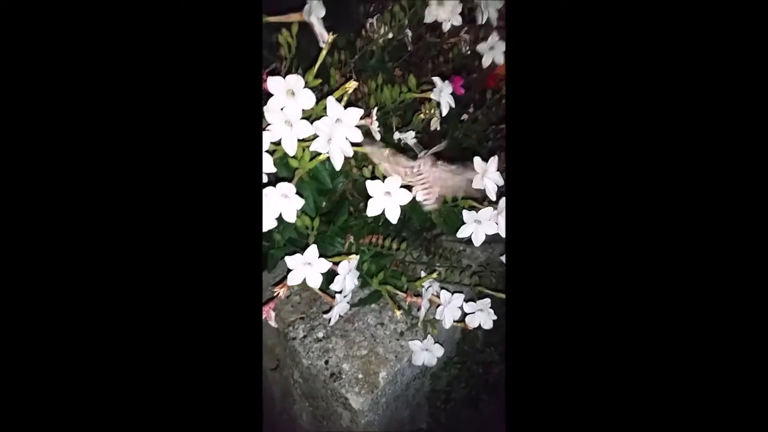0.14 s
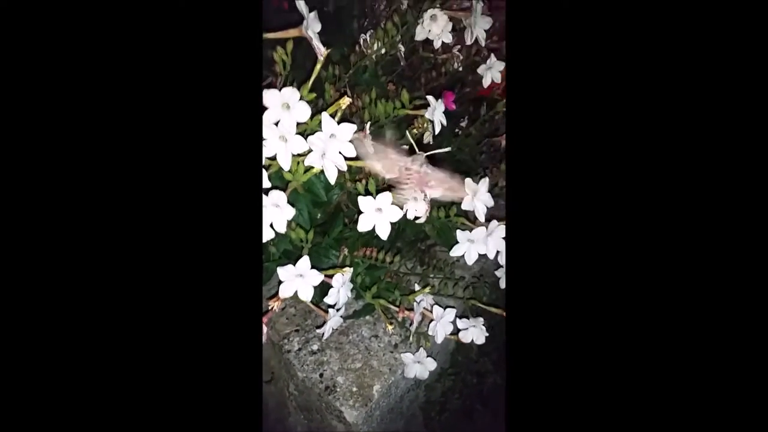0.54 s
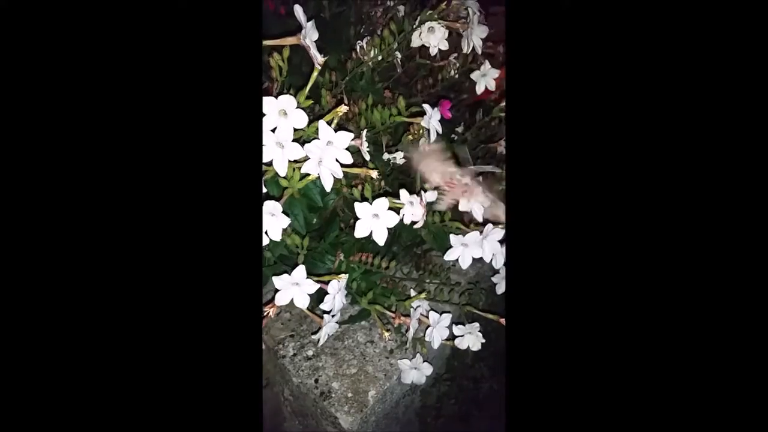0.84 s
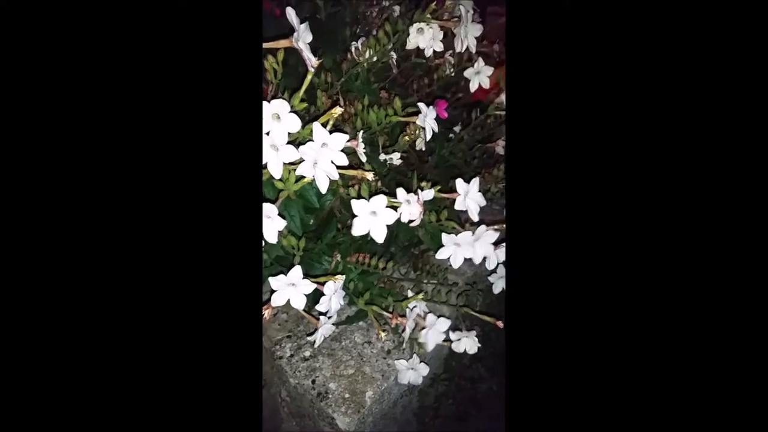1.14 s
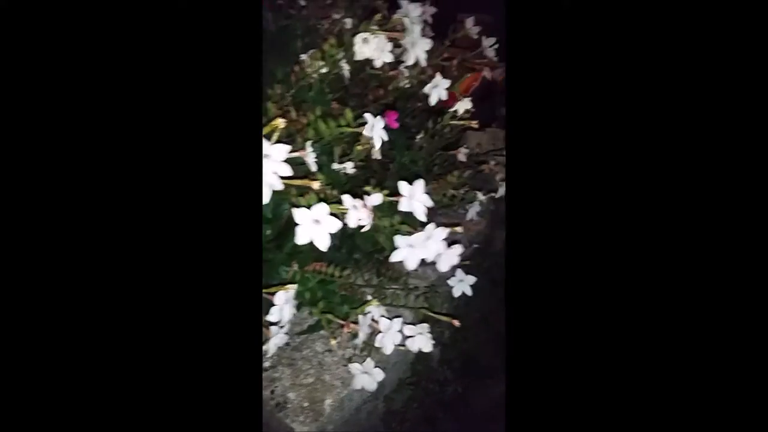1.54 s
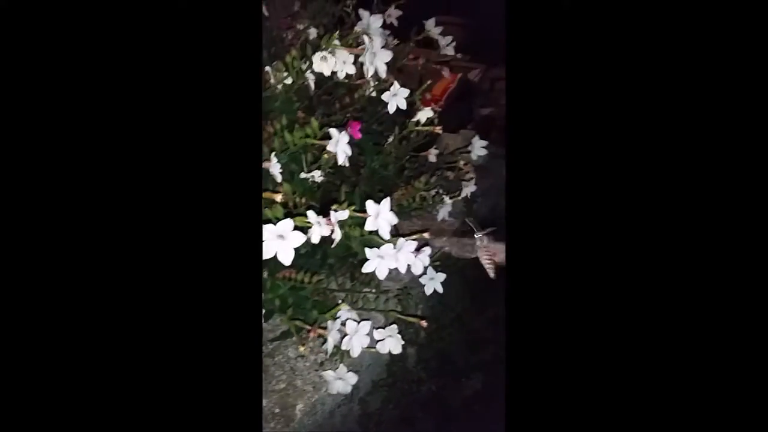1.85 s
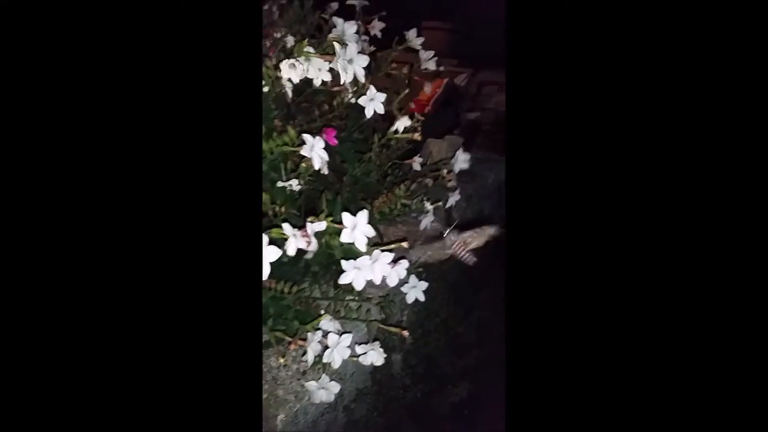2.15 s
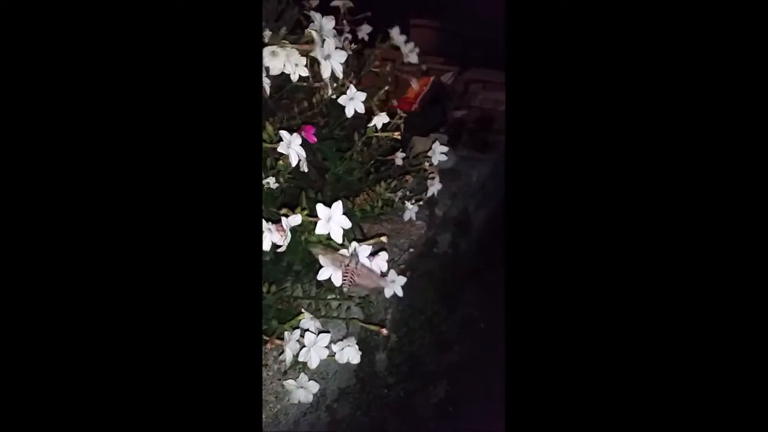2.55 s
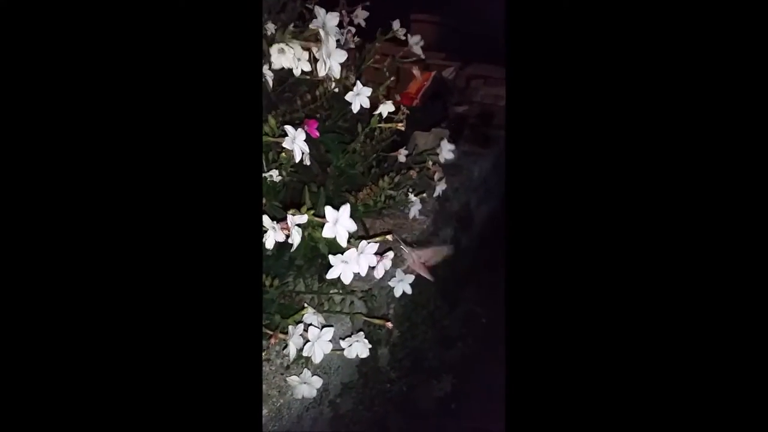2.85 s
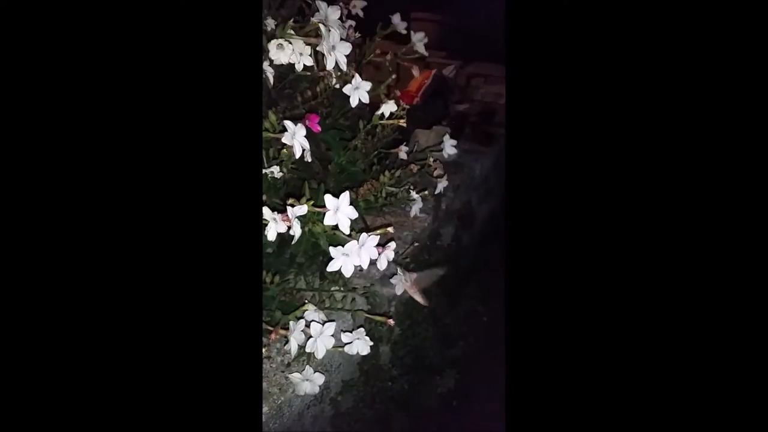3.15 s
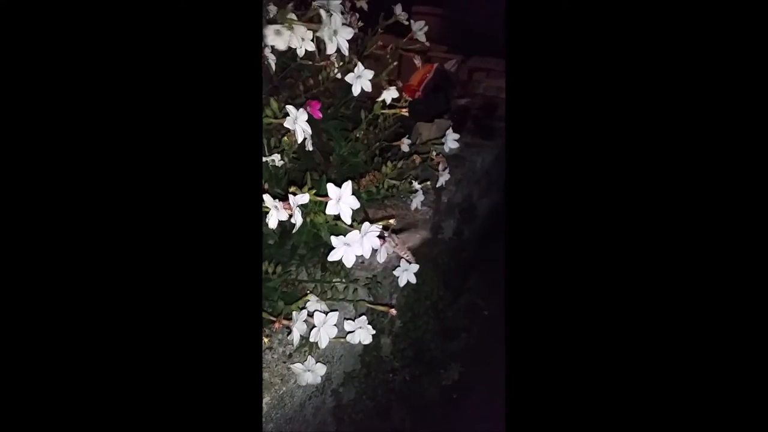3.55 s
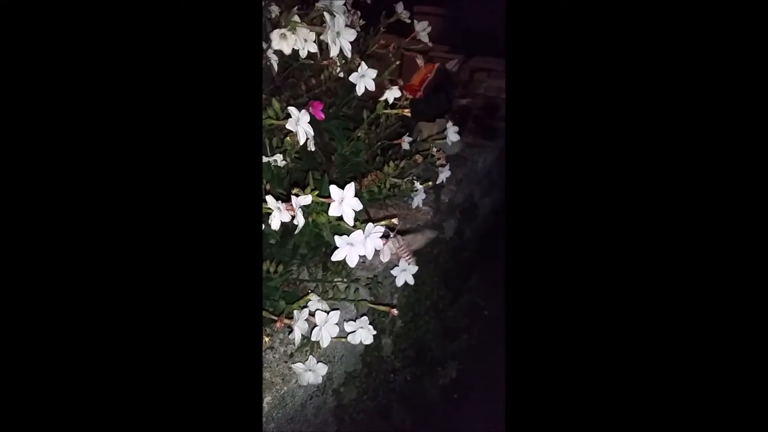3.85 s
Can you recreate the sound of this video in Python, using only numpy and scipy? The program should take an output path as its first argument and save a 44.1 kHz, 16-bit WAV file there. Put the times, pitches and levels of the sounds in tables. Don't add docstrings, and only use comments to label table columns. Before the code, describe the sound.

Heavy wind rumble and popping gusts on a microphone at night, over thin high katydid scraping

```python
import sys
import numpy as np
from scipy import signal
from scipy.fft import rfft, irfft, next_fast_len
from scipy.io import wavfile
from scipy.ndimage import uniform_filter1d, minimum_filter1d, map_coordinates

SR = 44100
rng = np.random.default_rng(int(sys.argv[2]) if len(sys.argv) > 2 else 0)


def waveform_to_disk(signal):
    frames = np.transpose(np.atleast_2d(signal))
    scaled = np.clip(frames, -1, 1) * 32767
    samples = np.round(scaled).astype(np.int16)
    wavfile.write(sys.argv[1], SR, samples)


def how_loud(loudness_db):
    steps = np.asarray(loudness_db, float) / 20
    return 10 ** steps


N = 176400


def unit(x):
    return x / np.sqrt(np.mean(x ** 2, axis=-1, keepdims=True) + 1e-20)


def along(points, hz):
    point_hz, point_db = np.transpose(points)
    return how_loud(np.interp(np.log(hz + 1), np.log(point_hz + 1), point_db))


def wobble(knots_per_s):
    at = np.arange(N) * knots_per_s / SR
    knots = rng.standard_normal((2, int(at[-1]) + 4))
    return np.array([map_coordinates(k, [at]) for k in knots])


def filtered(x, response):
    size = next_fast_len(N + 8192)
    return irfft(rfft(x, size) * response(np.fft.rfftfreq(size, 1 / SR)), size)[..., :N]


def noise(response):
    return filtered(rng.standard_normal((2, N)) * np.sqrt(SR / 2), response)


def peak(f, hz, wide_hz):
    return 1j * f * wide_hz / (hz * hz - f * f + 1j * f * wide_hz + 1e-9)


def band(f, hz, wide_hz, steep):
    return np.exp(-np.abs(2 * (f - hz) / wide_hz) ** steep)


def eddies(spectrum, even_s):
    x = noise(lambda f: along(spectrum, f))
    size = max(int(even_s * SR), 1)
    power = uniform_filter1d(uniform_filter1d(x * x, size), size)
    return unit(x / np.sqrt(np.abs(power) + 1e-12))


# start_s, level_db, width_s
LEFT_PORT_GUSTS = [(0.186, -20.5, 0.1), (0.283, -15.5, 0.031), (0.447, -15, 0.016), (0.529, -17.5, 0.097),
                   (0.623, -17, 0.0093), (0.738, -16.5, 0.018), (0.963, -24.5, 0.026),
                   (1.036, -26.5, 0.013), (1.242, -23, 0.026), (1.292, -15.5, 0.014), (1.445, -12.5, 0.063),
                   (1.589, -11, 0.042), (1.648, -12.5, 0.057), (1.702, -10, 0.013), (1.775, -14, 0.036),
                   (1.833, -14, 0.014), (1.929, -8.5, 0.023), (2.102, -8.5, 0.02), (2.237, -10, 0.032),
                   (2.317, -7.5, 0.032), (2.423, -35, 0.033), (2.535, -13.5, 0.03), (2.579, -23, 0.016),
                   (2.636, -20.5, 0.036), (2.883, -17, 0.033), (3.135, -10.5, 0.013), (3.247, -21, 0.016),
                   (3.301, -11, 0.012), (3.344, -18.5, 0.011), (3.399, -22, 0.01), (3.463, -15, 0.0081),
                   (3.554, -10, 0.02), (3.517, -8, 0.014), (3.621, -10, 0.059), (3.711, -16, 0.022),
                   (3.785, -21.5, 0.039), (3.985, -14, 0.02)]
RIGHT_PORT_GUSTS = [(0.05, -29, 0.015), (0.419, -28, 0.025), (0.562, -27, 0.026), (0.627, -41, 0.018),
                    (0.785, -27.5, 0.054), (1.174, -28, 0.016), (1.228, -30.5, 0.027), (1.456, -22, 0.05),
                    (1.568, -24, 0.027), (1.862, -34.5, 0.058), (2.016, -34.5, 0.026), (2.159, -38, 0.066),
                    (2.387, -31, 0.018), (3.026, -35, 0.044), (3.091, -26, 0.032), (3.191, -30, 0.025),
                    (3.319, -21.5, 0.084), (3.381, -36, 0.04), (3.455, -21.5, 0.018), (3.534, -21.5, 0.033),
                    (3.662, -21.5, 0.048), (3.766, -25.5, 0.023)]
# start_s, left_db, right_db
BREEZE = [(0, -18.5, -36), (0.089, -42, -39), (0.299, -28.5, -40), (0.882, -39, -33), (.95, -27, -45),
          (1.35, -36.5, -37.5), (1.651, -29.5, -35), (2.6, -23.5, -45), (2.8, -32, -46),
          (3.101, -32.5, -33), (3.551, -21, -28), (3.85, -34, -52), (4, -21.5, -19)]
# pitch_hz, level_db (per Hz)
RUMBLE_SPECTRUM = [(15, -27), (40, 0.5), (80, 3), (120, 0), (180, -21), (300, -42.5), (600, -71),
                   (1200, -120)]
FLUTTER_SPECTRUM = [(40, -31.5), (100, 4), (170, 8), (250, -9), (400, -28), (700, -35.5), (1100, -57.5),
                    (2000, -120)]


def wind():
    t = np.arange(N) / SR
    knot_s, *breeze_db = np.transpose(BREEZE)
    power = how_loud([np.interp(t, knot_s, db) for db in breeze_db] + 4 * wobble(16)) ** 2
    for port, gusts in zip(power, (LEFT_PORT_GUSTS, RIGHT_PORT_GUSTS)):
        for start_s, level_db, width_s in gusts:
            near = slice(max(int((start_s - 3 * width_s) * SR), 0), int((start_s + 5 * width_s) * SR))
            u = (t[near] - start_s) / width_s
            rise = (2.04 * u * max(width_s / 0.041, 1)) ** 4
            fade = np.abs(1.83 * u) ** 1.23
            port[near] += how_loud(2 * level_db) * np.exp(-np.where(u < 0, rise, fade))
    strength = np.sqrt(power) * np.minimum(t / .01, 1)

    lumps = unit(how_loud(2.5 * wobble(70)) * eddies(FLUTTER_SPECTRUM, .025))
    full_voice_db = np.array([[-14], [-22]])
    flutter_db, growth = -12, 1.56
    flutter = how_loud(full_voice_db + flutter_db) * (strength / how_loud(full_voice_db)) ** growth * lumps
    rumble = np.array([[.8], [.55]]) * strength * eddies(RUMBLE_SPECTRUM, 0.029)
    return rumble + flutter


# start_s, level_db, width_ms
LEFT_PORT_SNAPS = [(0.281, -8.5, 0.92), (0.305, -15.5, 0.99), (0.438, -11.5, 1.1), (1.434, -23.5, 0.41),
                   (1.45, -14.5, 0.77), (1.472, -6.5, 1), (1.588, -6, 0.77), (1.652, -3, 0.94),
                   (1.687, -2.5, 1.05), (1.709, -9.5, 0.61), (1.772, -9, 0.99), (1.922, -5.5, 1.1),
                   (1.949, -8.5, 1.13), (1.972, -9.5, 0.85), (2.076, -5, 0.92), (2.114, -15, 0.75),
                   (2.206, -7, 1.11), (2.234, -0.5, 0.69), (2.248, -17, 0.38), (2.287, -3, 1.3),
                   (2.305, -2, 0.6), (2.351, -2, 0.52), (2.542, -20, 0.58), (2.874, -24, 0.75),
                   (3.127, -3, 0.81), (3.163, -14, 1.24), (3.303, -22.5, 0.29), (3.394, -19, 0.8),
                   (3.428, -7, 0.95), (3.517, -6, 0.83), (3.553, -8, 0.84), (3.575, -13.5, 0.81),
                   (3.608, -6, 0.55), (3.624, -11.5, 0.5), (3.644, -3, 0.75), (3.659, -10.5, 0.92),
                   (3.684, -11, 0.93), (3.7, -11.5, 0.79), (3.928, -21.5, 0.87), (3.957, -20.5, 0.63),
                   (3.969, -6, 0.73), (3.983, -5.5, 0.77),
                   (0.17, -20.5, 0.99), (0.366, -28, 0.6), (.542, -20.5, 0.88), (0.741, -27, 0.93),
                    (1.032, -27.5, 0.7), (1.292, -21, 0.96), (1.639, -17.5, 0.41), (1.995, -19, 1),
                    (2.662, -22, 0.99), (2.686, -22.5, 1), (3.123, -14.5, 0.52), (3.464, -13.5, 0.99),
                    (3.509, -8.5, .8)]
RIGHT_PORT_SNAPS = [(0.047, -12, 0.51), (0.463, -28, 0.72), (0.577, -27, 0.61), (1.165, -26, 0.54),
                    (1.455, -18, 0.39), (1.49, -19.5, 0.57), (1.88, -28, 0.72), (1.951, -32, 0.91),
                    (3.083, -24, 0.84), (3.271, -22, 1), (3.329, -14, 0.78), (3.38, -17.5, 0.7),
                    (3.456, -20.5, 0.69), (3.511, -17, 0.63), (3.52, -22, 0.89), (3.534, -15, 0.81),
                    (3.643, -21.5, 0.63), (3.662, -16.5, 0.65)]


def snaps():
    size, lead = 4096, 1024
    spring_hz, cusp = 104, .04
    wake_db, wake_s = -13.5, 0.00909
    out = np.zeros((2, N + size))
    f = np.fft.rfftfreq(size, 1 / SR)
    for port, rows in zip(out, (LEFT_PORT_SNAPS, RIGHT_PORT_SNAPS)):
        for (start_s, level_db, ms), draw in zip(rows, rng.standard_normal((60, 3, 3))):
            turn = 2 * np.pi * f * ms / 1000
            hz = spring_hz / np.sqrt(ms)
            push = np.exp(-turn ** 2 / 2) + cusp * np.exp(-turn)
            swing = 2.5 * SR * ms / 1000 * push * peak(f, hz, 2 * hz)
            delays = np.exp(-2j * np.pi * f * wake_s * draw[1:, 1:2])
            wake = how_loud(wake_db) * draw[1:, 0] @ delays
            swing = swing * (np.sign(draw[0, 0] - .5) + wake)
            port[int(start_s * SR):][:size] += how_loud(level_db) * np.roll(irfft(swing), lead)
    return out[:, lead:N + lead]


def katydid(calls, hz, wide_hz, pan_db, count, wet):
    stroke_gap_s, tooth_s = .048, .003
    slowing, swell_db = .08, 9
    tooth = np.arange(count)
    along_s = np.cumsum(tooth_s * (1 + slowing) ** (tooth - count / 2))
    draw = rng.standard_normal((2, len(calls), 2, count, 2))
    late_s = .003 * rng.standard_normal((len(calls), 2, 1))
    stroke_s = calls[:, :1, None] + stroke_gap_s * np.arange(2)[:, None] + late_s
    tooth_at_s = stroke_s + along_s - .62 * along_s[-1] + .0004 * draw[..., 0]
    size = how_loud(calls[:, 1:, None] + swell_db * (tooth / count - 1.12) + 4.35 * draw[..., 1])
    at = np.clip((tooth_at_s * SR).astype(int), -1, N) + 1
    teeth = np.array([np.bincount(a.ravel(), g.ravel(), N + 2)[1:-1] for a, g in zip(at, size)])

    leaves = rng.standard_normal((2, 1400)) * how_loud(-60 * np.arange(1400) / SR / .03)
    leaves = wet * leaves / np.linalg.norm(leaves, axis=1, keepdims=True)
    leaves[:, 0] = [pan_db > 0, pan_db < 0]
    leaves = leaves * how_loud([[min(pan_db, 0)], [min(-pan_db, 0)]])
    leaves = leaves * np.sqrt(tooth_s / wide_hz) * SR * 0.75

    def wing(f):
        return band(f, hz, wide_hz, 2) / (1 + (9900 / (f + 1)) ** 40)

    return filtered(signal.fftconvolve(teeth, leaves, axes=1)[:, :N], wing)


# first_stroke_db, second_stroke_db
LEFT_SINGER = [(-72, -58), (-57, -75), (-59, -59.5), (-61.5, -62.5), (-57.5, -52), (-57, -65), (-51, -56),
               (-61, -83), (-64.5, -63), (-64, -77), (-66, -62), (-61, -72), (-71, -78), (-56.5, -78),
               (-63, -74), (-77, -69), (-57, -56.5), (-56, -54), (-55, -59), (-56, -66), (-71, -61),
               (-57.5, -55.5), (-57.5, -67), (-59.5, -55.5), (-62, -61.5)]
RIGHT_SINGER = [(-59, -49.5), (-56.5, -55), (-63, -60.5), (-54.5, -56), (-73, -65), (-61, -61), (-58, -61),
                (-65, -61.5), (-72, -65), (-65, -51.5), (-66, -61.5), (-67, -73.5), (-57.5, -60),
                (-60.5, -51.5), (-63, -57.5), (-67, -64.5), (-69, -58.5), (-56, -54.5), (-58, -58.5),
                (-64.5, -57), (-57, -62), (-63, -63), (-56, -54), (-65, -63.5), (-68, -63)]
# start_s, level_db
HIGH_SINGER = [
    (0, -70),
    (1.9, -66),
    (2.35, -71),
    (3, -63),
    (4, -62),
]


def katydids():
    def beat(first_s, period_s, stroke_db):
        return np.column_stack([first_s + period_s * np.arange(len(stroke_db)), stroke_db])

    left_calls = beat(-.006, .1584, LEFT_SINGER + [(-62, -60)])
    right_calls = beat(.014, .1584, RIGHT_SINGER + [(-63, -63)])
    start_s = .053 + .1621 * np.arange(25)
    level_db = np.interp(start_s, *np.transpose(HIGH_SINGER))
    high_calls = np.column_stack([start_s, level_db + 1, level_db])
    high_calls = high_calls + [.002, 2.5, 2.5] * rng.standard_normal((25, 3))

    left = katydid(left_calls, 11050, 1900, 4, count=11, wet=1.1)
    right = katydid(right_calls, 10800, 1500, -3, count=13, wet=.9)
    high = katydid(high_calls, 11900, 3200, 9, count=6, wet=1.1)
    return left + right + high


# start_s, left_db, right_db
FINGER_TICKS = [
    (0.0444, -79, -54.5),
    (.5755, -67, -51.5),
    (0.5786, -51.5, -42),
    (0.5806, -55.5, -47),
    (0.582, -63.5, -48.5),
]
# pitch_hz, width_hz, level_db
CASE_MODES = [(450, 700, 12), (1070, 300, 4), (5200, 3200, -12), (11000, 1600, -17), (15000, 1500, -20)]


def ticks():
    kicks = np.zeros((2, N))
    for start_s, *port_db in FINGER_TICKS:
        contact = .1 * rng.standard_normal(60) * how_loud(-.4 * np.arange(60))
        contact[0] = -1
        kicks[:, int(start_s * SR):][:, :60] += how_loud(port_db)[:, None] * contact
    return 12 * filtered(kicks, lambda f: sum(how_loud(db) * peak(f, hz, wide) for hz, wide, db in CASE_MODES))


def cricket_chorus():
    hum = unit(noise(lambda f: band(f, 4143, 1340, 2.1)))
    ripple = how_loud(0.77 * wobble(30) + 0.41 * wobble(6.1))
    return hum * ripple * how_loud([[-64.5], [-73]])


# pitch_hz, level_db (per Hz)
NIGHT_AIR = [(150, -73.5), (350, -83.5), (700, -88.5), (1200, -94), (2000, -101), (3000, -112),
             (6000, -119), (9000, -130)]
# pitch_hz, left_minus_right_db
NIGHT_LEAN = [(700, 3.5), (2500, 0), (6000, -5)]
# pitch_hz, level_db (per Hz)
INSECT_HISS = [(8000, -135), (9500, -124), (10300, -108), (11000, -104), (12200, -107), (14000, -109),
               (15500, -104)]


def night_background():
    sides = np.array([[.5], [-.5]])
    air = noise(lambda f: along(NIGHT_AIR, f) * along(NIGHT_LEAN, f) ** sides) * how_loud(.8 * wobble(6))
    hiss_lean_db = 3
    hiss = noise(lambda f: along(INSECT_HISS, f)) * how_loud(hiss_lean_db * sides + 1.1 * wobble(18))
    return air + hiss


def scene():
    return wind() + snaps() + katydids() + ticks() + cricket_chorus() + night_background()


def top_cut(x):
    return signal.sosfilt(signal.butter(12, 16850, fs=SR, output="sos"), x)


def record(dry):
    top_hz, ceiling = 15830, .845
    x = filtered(dry, lambda f: f < top_hz)
    need = minimum_filter1d(np.minimum(1, ceiling / (np.abs(x) + 1e-9)), size=801)
    mix = x * uniform_filter1d(need, size=400)
    return top_cut(mix)


dry = scene()
out = record(dry)
waveform_to_disk(out)
```